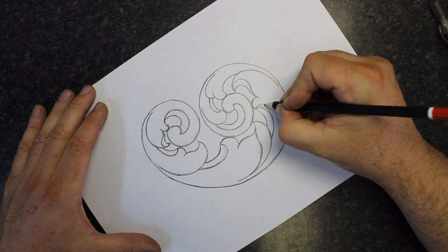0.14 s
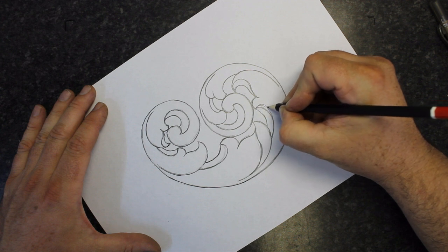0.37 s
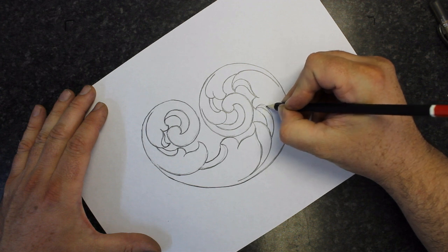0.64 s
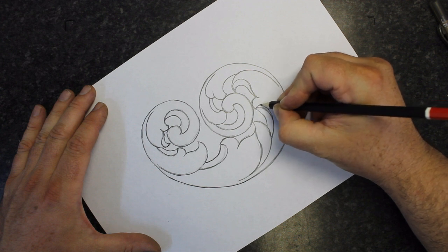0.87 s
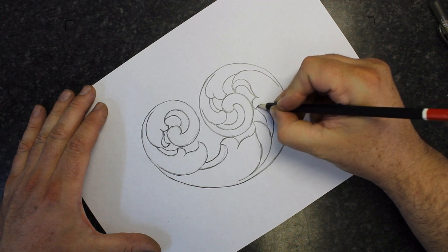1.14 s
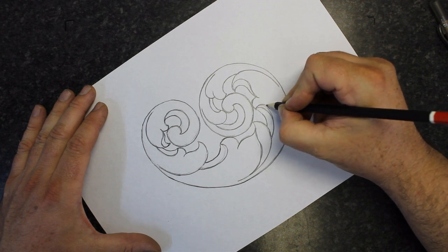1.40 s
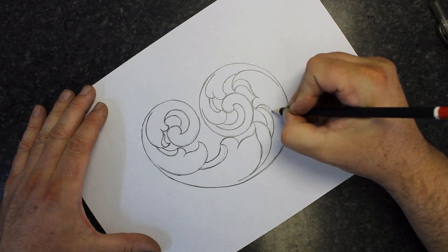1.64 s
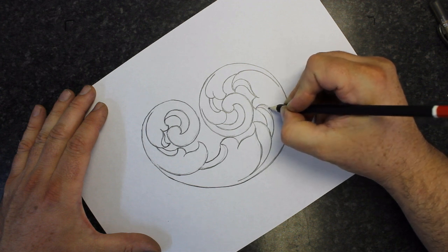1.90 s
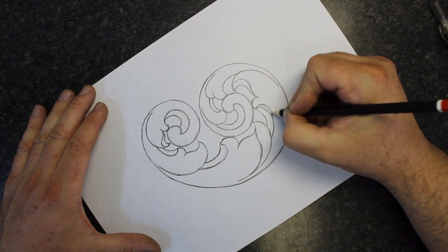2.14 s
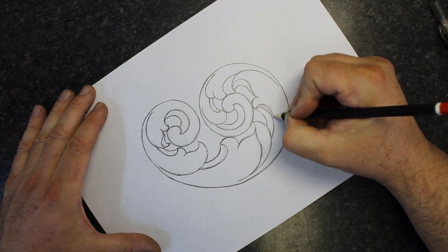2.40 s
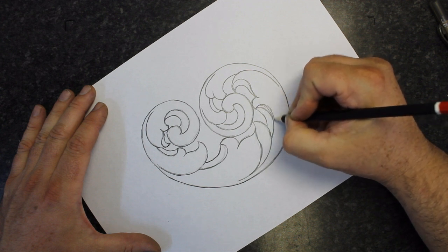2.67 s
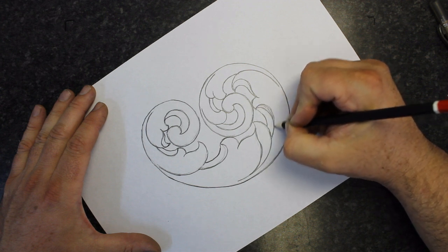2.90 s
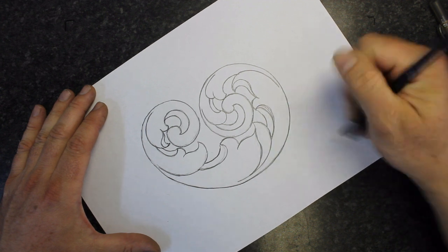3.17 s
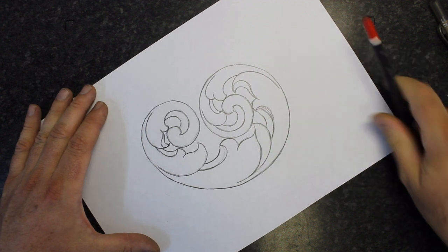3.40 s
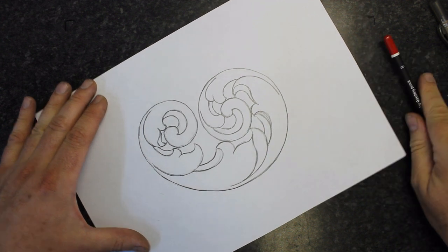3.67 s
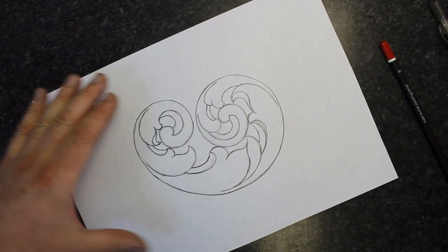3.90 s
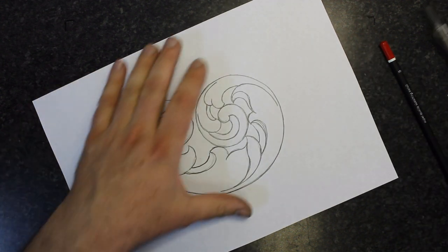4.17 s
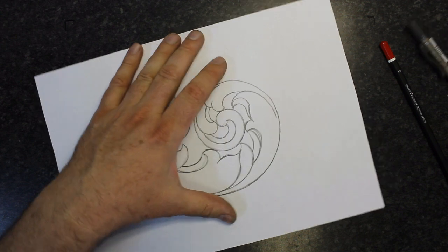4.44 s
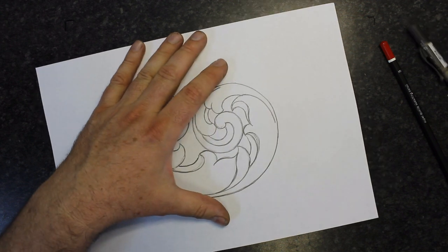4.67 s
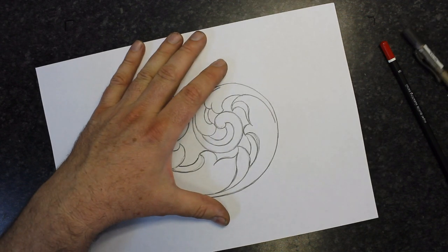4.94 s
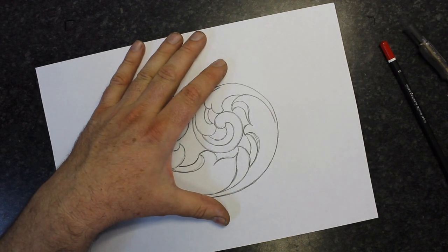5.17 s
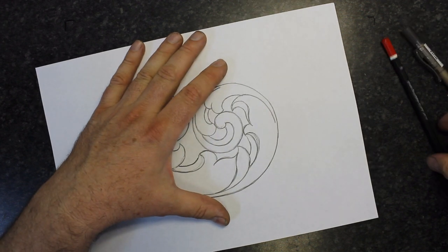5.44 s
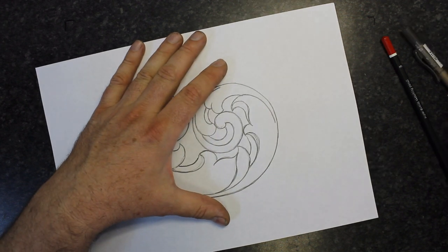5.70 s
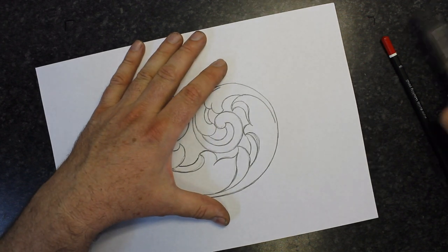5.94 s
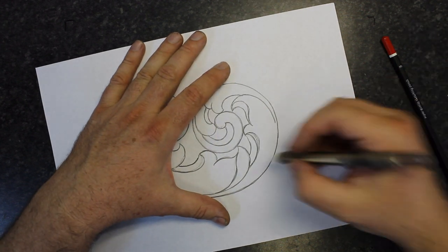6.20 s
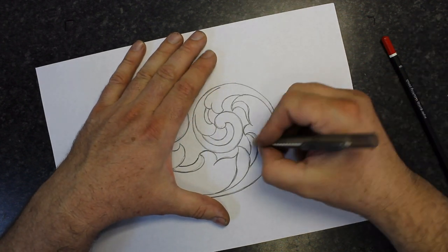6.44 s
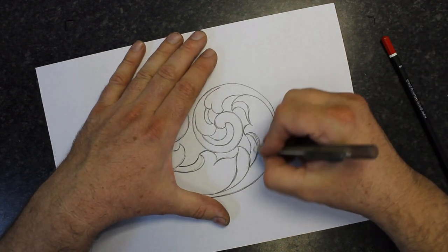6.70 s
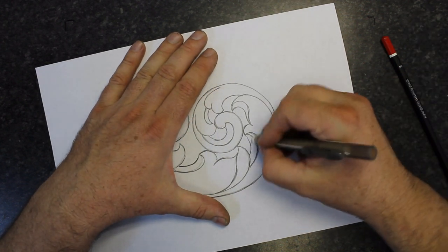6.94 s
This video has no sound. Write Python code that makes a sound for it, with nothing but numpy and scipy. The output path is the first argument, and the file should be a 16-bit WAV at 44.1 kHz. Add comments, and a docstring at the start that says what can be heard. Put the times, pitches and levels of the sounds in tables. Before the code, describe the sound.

In a quiet room with low hum, faint motor whine and distant traffic, a pencil makes short, light scratches on paper. After three seconds hand and paper rustle, then the pencil drops with a bright woody clatter and brief roll. The sheet slides, and pens clack loudly on the hard table, followed by small scrapes and ticks. One close microphone, identical in both channels, slight room reflection.

```python
"""At a hard table in a room, a pencil scratches short strokes on paper, is dropped, bounces and rolls.
The sheet is slid round and a hand handles pens at the side: grains of friction and bursts of contact
drive resonances. A small motor hums and whines as orders of one shaft; mains hum, a low hum and far
traffic are sines over shaped noise. One microphone with gain control feeds both channels."""
import sys
import numpy as np
from scipy import signal
from scipy.fft import rfft, irfft
from scipy.io import wavfile
from scipy.ndimage import uniform_filter1d

SR = 44100
rng = np.random.default_rng(int(sys.argv[2]) if len(sys.argv) > 2 else 0)


def how_loud(loudness_db):
    """Turn decibels into a plain amplitude multiplier (0 dB gives 1, 20 dB gives 10)."""
    steps = np.asarray(loudness_db, float) / 20
    return 10 ** steps


def transcribe(u):
    """Save the signal u as a 16-bit wav file named by the first command-line argument.

    u: samples, shape (n,) or (channels, n), limited to [-1, 1]; the rate is SR.
    q: integer samples, one column per channel.
    """
    v = np.clip(np.atleast_2d(u).T, -1, 1)
    q = np.round(v * 32767).astype(np.int16)
    wavfile.write(sys.argv[1], SR, q)


N = 312129

# steady noise of the room, relative spectrum: (frequency [Hz], density [dB/Hz])
ROOM_SPECTRUM = [(12, -38), (20, -9), (47, -13.5), (74, -9.5), (103, -4.5), (274, -13.5), (479, -15),
                 (1020, -19.5), (2340, -24.5), (2550, -25.5), (3970, -28.5), (6750, -30), (7340, -33.5),
                 (7970, -32), (15600, -52.5)]
# slow course of that noise: (time [s], level [dB rms])
ROOM_LEVEL = [(0.0, -50), (2.0, -51.5), (3.55, -51), (4.28, -49.5), (5.22, -49.5), (6.25, -52), (7.08, -50)]
# a low hum comes and goes: (time [s], level [dB rms])
LOW_HUM = [(2.3, -75), (3.0, -62), (3.5, -72), (3.8, -54), (3.95, -72), (4.1, -57), (4.45, -54), (4.7, -65),
           (5.5, -63), (6.13, -57), (6.5, -56), (6.68, -72), (7.08, -57)]
# a far engine drops a gear, pulls away and fades: (time [s], frequency [Hz], level [dB rms])
TRAFFIC = [(0.0, 67.5, -57), (.43, 52.8, -51), (.8, 53.9, -53.5), (1.4, 55.7, -56), (2.15, 59.7, -51.5),
           (2.5, 61.5, -53.5), (2.94, 64.2, -61), (3.4, 65, -59), (3.6, 65.5, -80), (7.08, 65.5, -100)]
# multiples of the shaft frequency heard from the motor: (order [1])
SHAFT_ORDERS = [2, 4, 6, 9, 10, 32, 34, 51, 52, 55, 57, 147, 149, 150]
# one row per order, throbbing with or against the wobble:
# (level [dB rms], early throb [-1..1], late throb [-1..1])
WHINE = [(-70, 0.026, -.42), (-61.5, -0.041, -0.23), (-70.5, -0.021, -0.038), (-70, -.02, 0.23),
         (-69, -0.15, -0.11), (-81, 0.21, .13), (-73, .07, -0.1), (-76, 0.017, 0.3), (-67.5, 0.39, 0.28),
         (-77, .26, -.06), (-76.5, .27, .15), (-69, -0.51, -0.054), (-65.5, 0.33, -1), (-71.5, .2, 0.14)]
# passage from the early to the late throb: (time [s], share of the late one [0..1])
THROB = [(0, 0), (3.8, 0), (5.0, 1), (7.08, 1)]
# soft thuds through the table: (time [s], strength [dB], frequency [Hz])
THUDS = [(2.299, -31.5, 127), (4.098, -40, 111), (4.351, -25.5, 117), (4.74, -36, 109), (5.409, -28, 106.3),
         (6.829, -32.5, 198)]
# the sheet slides under the hand: (time [s], hiss level [dB], dull rub level [dB])
SLIDE = [(3.05, -77, -85), (3.1, -57.5, -73), (3.35, -56, -56), (3.41, -62, -81), (3.8, -52.5, -77),
         (3.87, -56, -39), (4.05, -44.5, -48), (4.2, -60, -48), (4.32, -58.5, -54.5), (4.4, -55, -62),
         (4.68, -65, -72), (4.74, -80, -80), (5.17, -80, -65), (5.22, -62, -48), (5.36, -69, -62),
         (5.5, -63, -53), (5.65, -76, -64), (5.8, -70, -62), (6.0, -54.5, -55.5), (6.25, -62, -69),
         (6.4, -61, -69), (6.65, -72, -66), (7.08, -67, -81)]
# relative spectrum of the sliding hiss: (frequency [Hz], density [dB/Hz])
HISS = [(1530, -13), (2600, -7.5), (2790, -9.5), (2950, -4), (4110, -5.5), (4900, -2.5), (7370, -2),
        (9910, -13), (14000, -44)]
# resonances of the dull rub: (frequency [Hz], width [Hz], relative level [dB])
RUB = [(1350, 270, -8), (1800, 540, -3.5), (2360, 1170, -4), (3000, 940, -6)]
# short scrapes of fingers and paper: (time [s], length [s], level [dB], centre [Hz], width [Hz])
SCRAPES = [(3.09, 0.092, -60, 3950, 350), (3.09, .03, -61, 5000, 500), (3.163, .02, -55, 4050, 500),
           (3.35, .03, -60, 4900, 400), (3.158, 0.045, -58, 10660, 350), (3.21, .05, -61, 9500, 3500),
           (3.30, 0.051, -56, 7800, 2480), (3.445, 0.02, -55, 5000, 400), (4.38, .31, -59, 8200, 3500),
           (5.412, 0.022, -64, 1800, 2000), (5.84, .015, -51, 5500, 3000), (5.88, 0.047, -50.5, 3800, 5000),
           (5.95, 0.043, -50, 5060, 903), (6.005, 0.04, -51, 8200, 2500), (6.27, 0.03, -52, 5460, 1504),
           (6.385, 0.22, -54, 6500, 4450), (6.72, .047, -58, 6800, 3000), (6.82, .035, -56.5, 6200, 2000)]
# a pen is dragged over the table: (time [s], length [s], level [dB], share of upper resonances [dB])
DRAGS = [(4.10, 0.12, -39, -6), (5.459, 0.036, -36.5, 0), (5.559, 0.04, -46.5, -5.5),
         (5.808, 0.067, -43, -16), (6.007, 0.028, -47, -12)]
# resonances of the pen's barrel: (frequency [Hz], width [Hz], relative level [dB])
PEN = [(1480, 570, 2.5), (2470, 620, 2.5), (5000, 450, 4.5), (6470, 1040, -0.5)]
# pens ticking and clacking: (time [s], strength [dB], centre [Hz], dull part [dB])
CLACKS = [(3.0681, -37.5, 6600, 4), (3.35, -41, 4700, -2), (4.0781, -14, 4800, -7),
          (4.1005, -26.5, 4930, 7.5), (4.343, -31, 5510, -4), (4.3644, -40, 12000, -5),
          (4.744, -1.5, 5930, -20), (5.0387, -10, 4670, -8), (5.1541, -18.5, 4520, 2),
          (5.1661, -17, 6800, -2), (5.413, -38, 6440, 5), (5.4448, -18, 6450, -9.5), (5.668, -40, 4500, -3),
          (6.1656, -21.5, 5160, -22), (6.17, -23.5, 5070, -30), (6.3829, -38, 6120, -10)]
# strokes of the lead: (time [s], length [s], level at start [dB], level at end [dB])
STROKES = [(0.0, .6, -66, -64.5), (.68, .42, -61.5, -63), (1.202, .58, -64.5, -58),
           (1.989, .16, -59, -54.5), (2.349, 0.177, -54, -55), (2.686, 0.15, -61, -51.5),
           (2.953, .095, -54, -54)]
# resonances of lead and shaft while drawing, the main four first:
# (frequency [Hz], width [Hz], relative level [dB])
SHAFT = [(6040, 240, 0), (8130, 330, -1), (8480, 200, -6), (11400, 200, -15), (2900, 1000, -9),
         (4960, 300, -10), (7400, 600, -4), (9900, 400, -11), (10800, 700, -11)]
# relative spectrum of the broad scratch: (frequency [Hz], density [dB/Hz])
BROAD_SCRATCH = [(1500, -30), (2500, 6), (3500, 4), (5000, 7), (8500, 3), (11500, -2), (15500, -25)]
# the pencil meets the table: (time [s], strength [dB], share of the lower modes [dB])
DROP = [(3.8357, -4.5, -7), (3.837, -3, -6.5), (3.8414, -20, -19), (3.876, -14, -12), (3.8790, -24, -2),
        (3.901, -23, -7), (3.9027, -19.5, -10), (3.9172, -28, -1.5)]
# the pencil rolls out: (time [s], drive level [dB])
ROLL = [(3.85, -46), (3.88, -57), (4.06, -59), (4.34, -74.5)]
# modes of the pencil: (frequency [Hz], level [dB], t60 [s])
PENCIL = [(560, -32, 0.064), (1604, -30.5, 0.05), (2604, -15.5, 0.0255), (3560, -13.5, 0.021),
          (4732, -9.5, .035), (4900, -7.5, .045), (4935, -27, 1.1), (5044, -31, .3), (11140, -54, .4),
          (6290, -14.5, 0.017), (6670, -10.5, 0.0084), (7180, -7, 0.02), (7680, -14.5, 0.028),
          (7380, -13.5, 0.02), (7400, -21, 0.027), (7880, -37, 0.54), (7483, -41, 0.25),
          (8400, -23.5, 0.022), (8800, -41, 0.0258), (11080, -42, 0.052), (14050, -44, .025),
          (15440, -48, 0.017)]

MOTOR_HZ, WOBBLE_HZ, WOBBLE_START_RAD = 48.262, 3.173, -2.9
MAINS_HZ, MAINS_DB, LOW_HUM_HZ = 100.0, -50, 49.2
GRIP_S, FADE_SHARE = 0.0083, 0.42   # scrapes start quickly and fade over the last part of their length
CHATTER_MS = 3.43
TOUCH_S, LIFT_S = 0.067, 0.03   # the lead comes down, lifts
LIGHT_DB, FIRM_DB = -65, -55.5   # stroke levels at light and at firm pressure
RING_OVER_CRACK_DB = 8.5


def rms_one(x):
    """Normalisation to unit mean power."""
    return x / np.sqrt(np.mean(x ** 2) + 1e-20)


def in_time(rows, off_db=-120):
    """Linear interpolation of a table's columns at every sample; off_db outside its span."""
    s, *columns = np.transpose(rows)
    t = np.arange(N) / SR
    return [np.interp(t, s, c, left=off_db, right=off_db) for c in columns]


def coloured(x, spectrum):
    """Linear filtering: a steady signal takes on a (Hz, dB) spectrum; rms 1."""
    hz, level_db = np.transpose(spectrum)
    grid = np.fft.rfftfreq(len(x), 1 / SR) + 1
    gain = how_loud(np.interp(np.log(grid), np.log(hz), level_db))
    return rms_one(irfft(rfft(x) * gain, len(x)))


def drift(rate_hz):
    """Low-pass random process: slow chance with spread 1, computed at every 40th sample."""
    r = np.exp(-80 * np.pi * rate_hz / SR)
    noise = rng.standard_normal(N // 40 + 2002)
    slow = signal.lfilter([1], [1, -2 * r, r * r], noise)[2000:]   # past the settling of the filter
    return np.interp(np.arange(N) / 40, np.arange(len(slow)), rms_one(slow))


def resonate(x, hz, width_hz):
    """Simple resonator: one pole pair, gain 1 on top."""
    r = np.exp(-np.pi * width_hz / SR)
    zeros = np.array([1, 0, -1]) * (1 - r * r) / 2
    return signal.lfilter(zeros, [1, -2 * r * np.cos(2 * np.pi * hz / SR), r * r], x)


def body(x, peaks):
    """Modal superposition: resonances in parallel, signs alternating; rms 1."""
    modes = [how_loud(db) * resonate(x, hz, width) for hz, width, db in peaks]
    return rms_one(sum((-1) ** k * mode for k, mode in enumerate(modes)))


def band(x, low_hz, high_hz, order=2):
    """Butterworth band-pass: maximally flat between its corners."""
    return signal.sosfilt(signal.butter(order, [low_hz, high_hz], "band", fs=SR, output="sos"), x)


def low_pass(x, order, corner_hz):
    """Butterworth low-pass: maximally flat below its corner."""
    return signal.sosfilt(signal.butter(order, corner_hz, fs=SR, output="sos"), x)


def grains(per_s, spread_db):
    """Stick-slip friction: random tiny slips of uneven size."""
    sizes = how_loud(spread_db * np.minimum(rng.exponential(1, N), 5)) * rng.choice([-1, 1], N)
    return sizes * (rng.random(N) < per_s / SR) + 1e-18


def burst(noise, rattle_ms):
    """Impact excitation: a contact is a few ms of exponentially dying chatter."""
    return noise * np.exp(-np.arange(len(noise)) / (rattle_ms * SR / 1000)) / 2


def rubbed(rows, colour):
    """Friction drive: uneven slips, quickly on and off; colour(slips, *rest of row) adds the resonances."""
    out = np.zeros(N)
    slips = grains(10000.0, spread_db=2.4) * how_loud(2.5 * drift(80))
    for s, length, level_db, *rest in rows:
        at, n = round(s * SR), round(length * SR)
        t = np.arange(n) / SR
        shape = np.clip(np.minimum(t / GRIP_S, (length - t) / (FADE_SHARE * length)), 0, 1)
        out[at:at + n] += how_loud(level_db) * shape * rms_one(colour(slips[at:at + n], *rest))
    return low_pass(out, 3, 10500)


def room_noise():
    """Stationary noise: a fixed spectrum whose level changes slowly."""
    return coloured(rng.standard_normal(N), ROOM_SPECTRUM) * how_loud(in_time(ROOM_LEVEL)[0])


def mains_hum():
    """Forced vibration at twice the mains frequency: a sine of steady pitch, its level drifting a little."""
    tone = np.sin(2 * np.pi * MAINS_HZ * np.arange(N) / SR)
    return np.sqrt(2) * how_loud(MAINS_DB + 0.99 * drift(2.4)) * tone   # root 2 turns rms into peak


def low_hum():
    """Amplitude modulation: a low sine of fixed pitch comes and goes."""
    return np.sqrt(2) * how_loud(in_time(LOW_HUM)[0]) * np.sin(2 * np.pi * LOW_HUM_HZ * np.arange(N) / SR)


def traffic():
    """Frequency modulation: the drone of a far engine follows its speed and wavers in level."""
    hz, drone_db = in_time(TRAFFIC)
    tone = np.sin(2 * np.pi * np.cumsum(hz) / SR)
    return np.sqrt(2) * how_loud(drone_db + 2.6 * drift(9.1)) * tone


def motor():
    """Harmonics of rotation: all orders share one slightly wobbling shaft, each throbbing in its own way."""
    out = np.zeros(N)
    beat = 2 * np.pi * WOBBLE_HZ * np.arange(N) / SR + WOBBLE_START_RAD
    speed = 1 + 0.0007 * np.cos(beat + 0.4) + 0.0002 * drift(4)
    turns = np.cumsum(MOTOR_HZ * speed) / SR
    late, = in_time(THROB, off_db=0)
    for multiple, (level_db, early_throb, late_throb) in zip(SHAFT_ORDERS, WHINE):
        depth = early_throb + (late_throb - early_throb) * late
        sway = (1 + depth * np.cos(beat - 0.33 * late)) * how_loud(2.56 * drift(26))
        out += how_loud(level_db) * sway * np.sin(2 * np.pi * (multiple * turns + rng.random()))
    return np.sqrt(2) * out


def room(x, wall_ms=18.0, wall_db=-41, tail_db=-45):
    """Reflection and reverberation: a smeared echo from the nearest wall and a dense, dulled tail."""
    t, t60 = np.arange(SR) / SR, 0.7
    decay = how_loud(-60 * t / t60) * np.clip(t / 0.019, 0, 1)   # builds up over 19 ms
    tail = rms_one(rng.standard_normal(SR)) * decay * how_loud(tail_db)
    smear = np.exp(-0.5 * ((1000 * t - wall_ms) / 4.5) ** 2)
    echo = rng.standard_normal(SR) * smear * how_loud(wall_db)
    return signal.fftconvolve(x, low_pass(tail + echo, 2, 7500))[:N]


def thuds():
    """Damped oscillation: a soft push rings the table top for a few cycles."""
    out, t = np.zeros(N + 6000), np.arange(6000) / SR
    swell = (t / 0.02) * np.exp(-t / 0.014)
    for s, strength_db, hz in THUDS:
        out[round(s * SR):][:6000] += how_loud(strength_db) * np.sin(2 * np.pi * hz * t) * swell
    return out[:N]


def sliding():
    """Dry friction of a sheet: a smooth hiss of paper on the table and a duller, grainy rub."""
    hiss_db, rub_db = in_time(SLIDE)
    hiss = coloured(grains(12000.0, spread_db=2.0), HISS) * how_loud(hiss_db + 2.3 * drift(27))
    rub = body(grains(8000.0, spread_db=3.5), RUB) * how_loud(rub_db + 3.4 * drift(29.8))
    return hiss + rub


def scrapes():
    """Friction-driven resonance: each scrape has a resonance of its own, narrowed by a second, broader one."""
    def own_resonance(slips, hz, width):
        return resonate(resonate(slips, hz, width), hz, 1.5 * width)
    return rubbed(SCRAPES, own_resonance)


def drags():
    """Friction-driven resonance: the slips ring the barrel of the pen."""
    def barrel(slips, upper_db):
        out = 0
        for hz, width, db in PEN:
            gain = how_loud(db + upper_db * (hz > 4000))
            out = out + gain * resonate(resonate(slips, hz, width), hz, 2.1 * width)
        return out
    return rubbed(DRAGS, barrel)


def clacks():
    """Impact of small bodies: a bright ring at its own pitch, a broad crack and a dull knock."""
    out = np.zeros(N + 3000)
    noises = rng.standard_normal((len(CLACKS), 3, 3000))
    for (s, strength_db, hz, dull_db), noise in zip(CLACKS, noises):
        ring = 2.52 * resonate(burst(noise[0], CHATTER_MS), hz, 1200.0)
        crack = 0.98 * band(burst(noise[1], CHATTER_MS), 2710, 8100, order=3)
        knock = how_loud(dull_db) * band(burst(noise[2], 5.5 * CHATTER_MS), 380, 2800)
        out[round(s * SR):][:3000] += how_loud(strength_db) * (ring + crack + knock)
    return low_pass(out[:N], 2, 10500)


def strokes():
    """Stick-slip on paper fibres, thousands of catches a second: light pressure rings only the shaft's
    main bands, firm pressure wakes the others and a broad scratch."""
    slips, t = grains(9000.0, spread_db=1.5), np.arange(N) / SR
    level = np.full(N, 1e-6)
    for s, length, start_db, end_db in STROKES:
        contact = np.clip(np.minimum((t - s) / TOUCH_S, 1 + (s + length - t) / LIFT_S), 0, 1)
        level += contact ** 2 * how_loud(np.interp(t, [s, s + length], [start_db, end_db]))
    firm = np.clip((20 * np.log10(level) - LIGHT_DB) / (FIRM_DB - LIGHT_DB), 0, 1)
    ringing = resonate(body(slips, SHAFT[:4]), 7800, 9000)
    woken = 0.64 * body(slips, SHAFT[4:]) + 0.83 * coloured(slips, BROAD_SCRATCH)
    scratch = band(ringing + firm * woken, 1600, 12000, order=3)
    return level * how_loud(1.6 * drift(28)) * scratch


def pencil():
    """Modal excitation: bounces and the rattle of rolling ring the same modes; the spot that lands sets
    the share of the lower ones."""
    out, chatter = np.zeros(N), rng.standard_normal((len(DROP), 800))
    rolling = rms_one(grains(3700.0, spread_db=3.0)) * how_loud(in_time(ROLL)[0])
    at = [round(s * SR) for s, strength_db, low_db in DROP]
    for i, (s, strength_db, low_db), noise in zip(at, DROP, chatter):
        crack = band(burst(noise, 5.2), 1500, 10000, order=4)
        out[i:i + 800] += how_loud(strength_db) * crack
    for k, (hz, level_db, t60) in enumerate(PENCIL):
        force = rolling + 1e-18
        force[at] += [how_loud(strength_db + RING_OVER_CRACK_DB + low_db * (hz < 5500))
                      for s, strength_db, low_db in DROP]
        r, w = how_loud(-60 / (t60 * SR)), 2 * np.pi * hz / SR
        drive = [0, how_loud(level_db) * np.sin(w)]
        out += (-1) ** k * signal.lfilter(drive, [1, -2 * r * np.cos(w), r * r], force)
    return band(out, 800, 19000, order=2)


def scene():
    """Superposition: near sources with their reflections, thuds and the background, alike in both channels."""
    background = room_noise() + mains_hum() + low_hum() + traffic() + motor()
    near = sliding() + scrapes() + drags() + clacks() + strokes() + pencil()
    mono = background + thuds() + near + room(near)
    return np.stack([mono, mono])


def top_cut(x):
    """Nothing passes above the cut-off."""
    return signal.sosfilt(signal.butter(12, 15710, fs=SR, output="sos"), x)


def record(dry, start_db=-22, ratio=0.24, recover_db_s=25):
    """Automatic gain control: loud peaks pull the gain down a moment later and it creeps back; the top clips."""
    t = np.arange(N) / SR
    loudness_db = 20 * np.log10(uniform_filter1d(np.abs(dry[0]), 200) + 1e-9)
    over_db = np.maximum(loudness_db - start_db, 0) * ratio
    held_db = np.maximum.accumulate(over_db + recover_db_s * t) - recover_db_s * t
    r = np.exp(-1 / (0.0096 * SR))   # the gain lags by a time constant of 9.6 ms
    cut_db = signal.lfilter([1 - r], [1, -r], held_db)
    mix = np.clip(dry * how_loud(-cut_db), -1, 1)
    return top_cut(mix)


dry = scene()
out = record(dry)
transcribe(out)
```